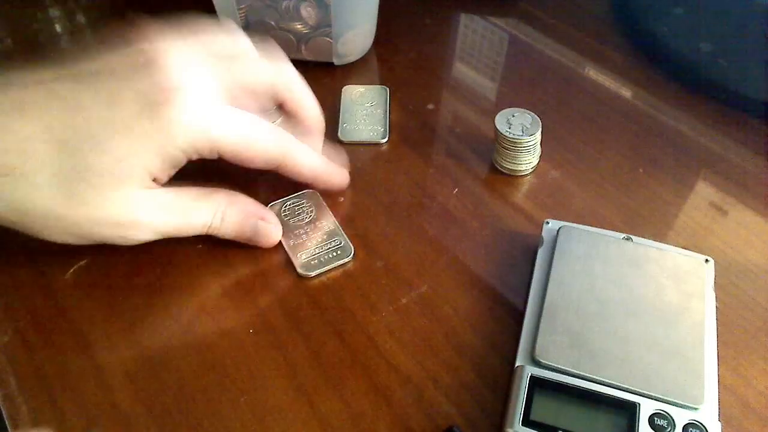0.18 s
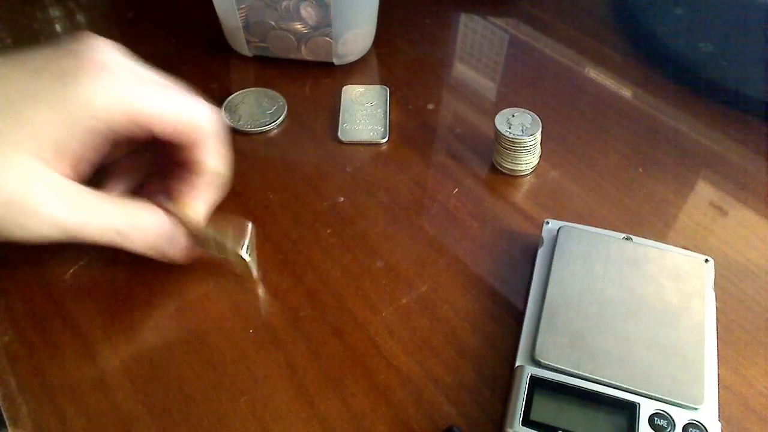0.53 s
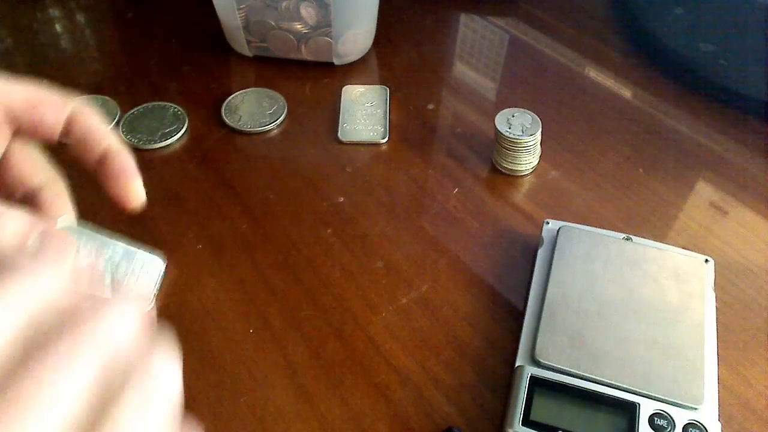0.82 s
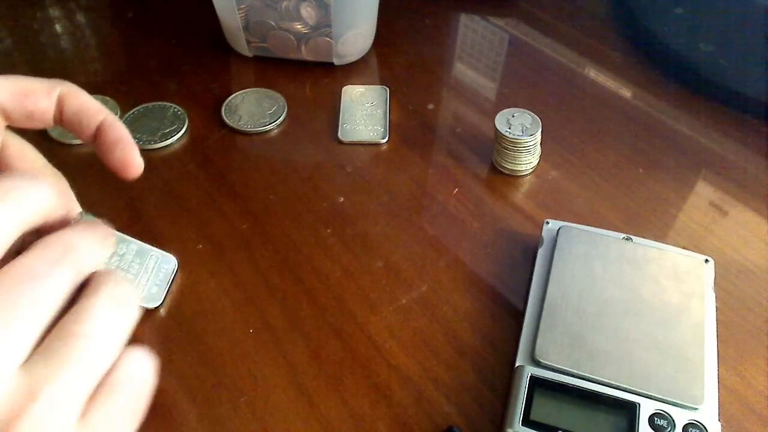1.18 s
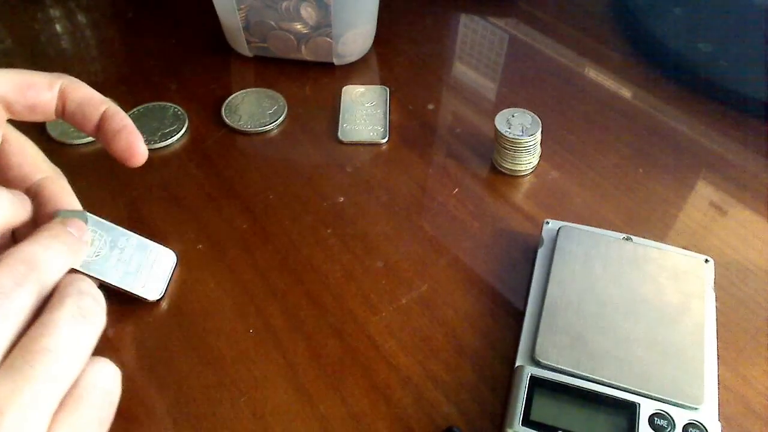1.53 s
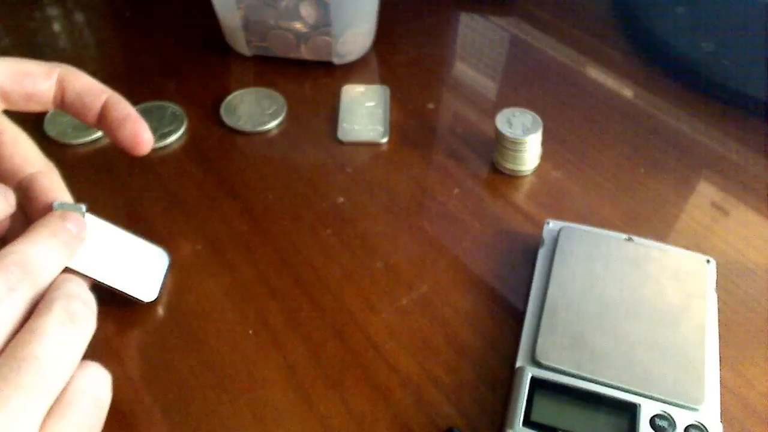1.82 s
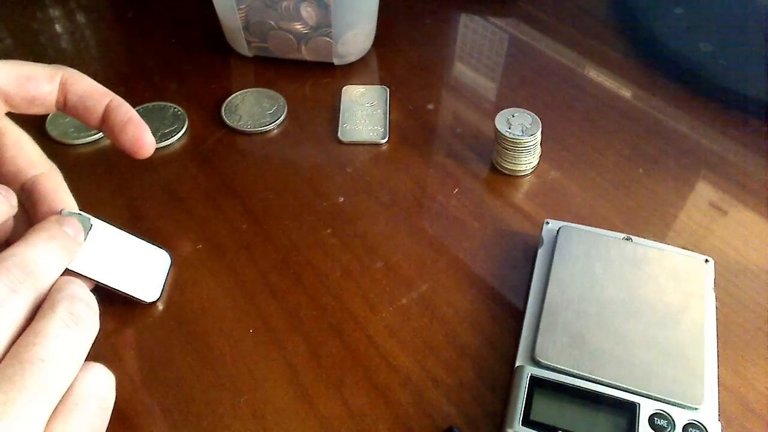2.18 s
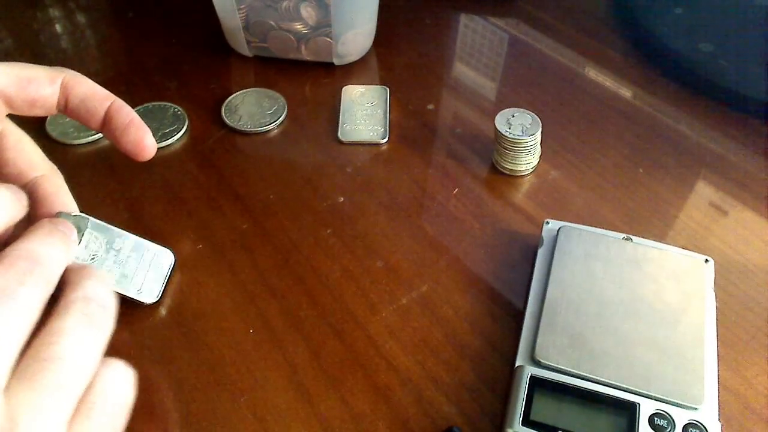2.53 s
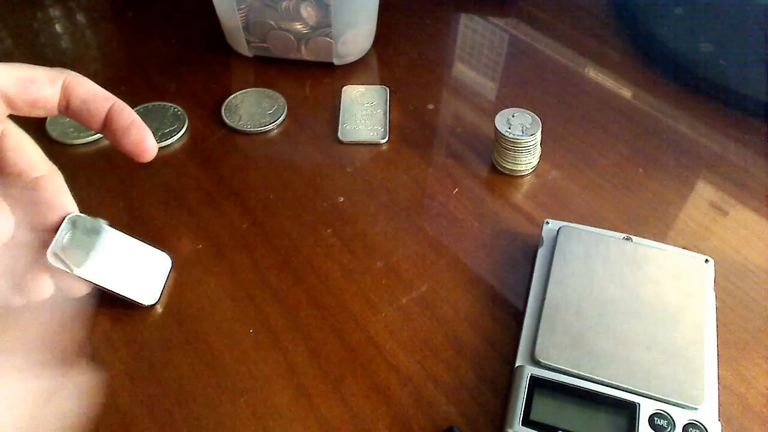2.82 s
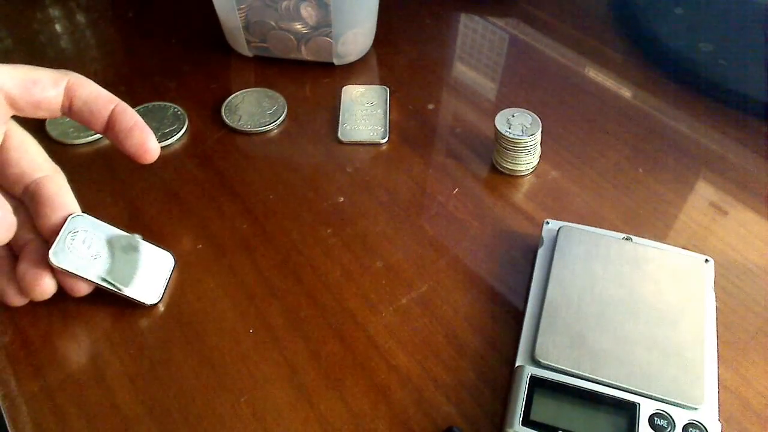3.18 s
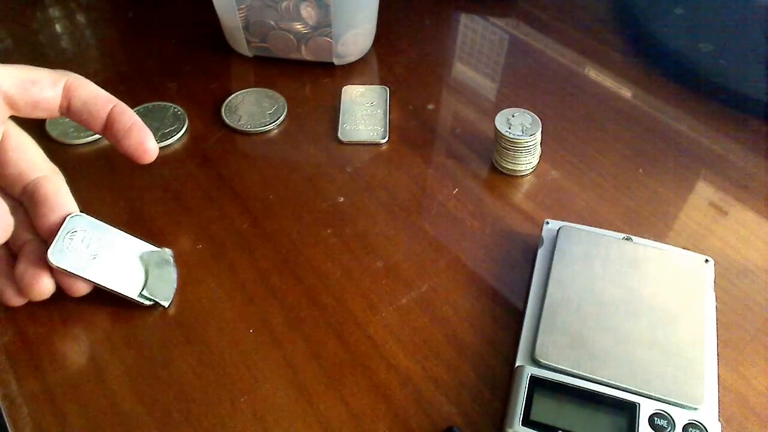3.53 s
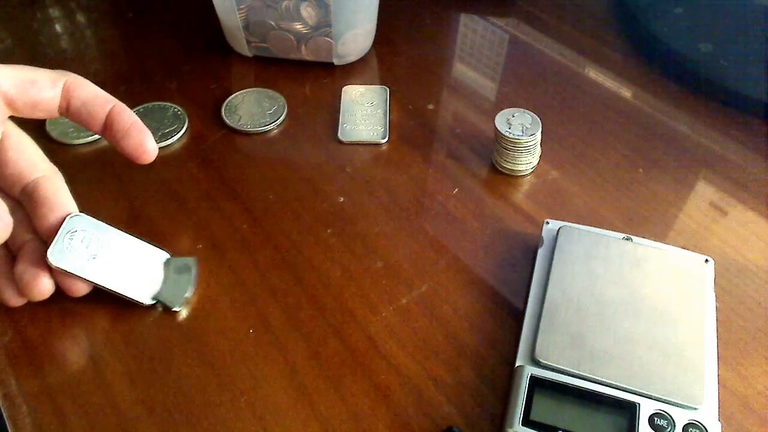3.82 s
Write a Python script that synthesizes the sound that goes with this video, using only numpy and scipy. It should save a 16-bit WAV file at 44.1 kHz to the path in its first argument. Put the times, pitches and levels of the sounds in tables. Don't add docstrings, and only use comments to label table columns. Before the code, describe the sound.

Close up in a small room, a silver bar cracks and clatters on a wooden tabletop, is briefly dragged, then tapped with bright clinks; later faint magnet slips and a small click over low hum.

```python
import sys
import numpy as np
from scipy import signal
from scipy.io import wavfile
from scipy.ndimage import uniform_filter1d

SR = 44100
rng = np.random.default_rng(int(sys.argv[2]) if len(sys.argv) > 2 else 0)


def store_wav(level_fs):
    pcm = np.round(np.clip(np.atleast_2d(level_fs), -1, 1) * 32767)
    wavfile.write(sys.argv[1], SR, pcm.T.astype(np.int16))


def linear_from_db(decibels):
    return 10 ** (np.asarray(decibels, float) / 20)


N = 176400


def evened(x):
    return x / np.sqrt(np.mean(x ** 2) + 1e-20)


def peaked(x):
    return x / (abs(x).max() + 1e-20)


def read(points, hz):
    f, value = np.transpose(points)
    return np.interp(np.log(hz + 1), np.log(f + 1), value)


def coloured(x, points):
    log_gain = np.log(linear_from_db(read(points, abs(np.fft.fftfreq(4096, 1 / SR)))))
    taps = np.fft.ifft(np.exp(np.conj(signal.hilbert(log_gain)))).real[:2048]
    return signal.oaconvolve(x, taps)[:len(x)]


def resonate(x, hz, width_hz):
    turn = np.exp(2j * np.pi * np.cumsum(hz * np.ones(len(x))) / SR)
    r = np.exp(-np.pi * width_hz / SR)
    return 2 * (turn * signal.lfilter([1 - r], [1, -r], x / turn)).real


def resonate_twice(x, hz, width_hz, second_width_hz):
    return resonate(resonate(x, hz, width_hz), hz, second_width_hz)


def wobble(shape):
    rattle_db = 2
    return linear_from_db(rattle_db * evened(uniform_filter1d(rng.standard_normal(shape), size=200)))


def ring(modes, t):
    hz, db, t60 = np.transpose(modes)[:, :, None]
    dying = linear_from_db(db - 60 * t / t60) * np.sin(2 * np.pi * hz * t)
    return (wobble((len(modes), len(t))) * dying).sum(axis=0)


def in_room(near, far, peak_db):
    room_db, gate_s, gate_db, gate_floor_db, mic_low_hz = -12.5, 0.11, -21, -84, 185
    # pitch_hz, t60_s
    room_decay = [(150, 0.07), (600, 0.28), (2000, 0.2), (5000, 0.2), (15000, 0.069)]
    hz, t, z = signal.stft(rng.standard_normal(len(near)), SR, nperseg=256)
    z = z * linear_from_db(-60 * t / read(room_decay, hz)[:, None])
    tail = signal.istft(z, SR, nperseg=256)[1][:len(near)]
    t = np.arange(len(near)) / SR
    tail = tail * np.clip(t / 0.012, 0, 1)
    wet = near + linear_from_db(room_db) * signal.fftconvolve(far, tail / np.linalg.norm(tail))[:len(near)]
    heard = signal.sosfilt(signal.butter(N=4, Wn=mic_low_hz, btype="high", fs=SR, output="sos"), wet)
    open_s = gate_s * max(1 - peak_db / gate_floor_db, .1)
    return heard * linear_from_db(gate_db * (t / open_s) ** 4.5)


def knock(peak_db, low_db, treble_db, contact_s):
    wood_db, wood_share, wood_t60_s, wood_loss = -3, 0.16, .11, -.7
    crack_db, split_low_hz, split_high_hz = 9, 1700, 4400
    spike, echo_s, echo_share = 2.2, 0.0021, .45
    # pitch_hz, level_db; higher modes die sooner
    table_modes = [(222, -3.5), (280, -7), (440, -4), (560, -8), (790, -6.5), (850, 2.5), (1040, 3),
                   (1185, 1), (1560, -2), (1640, -0.5), (2420, -8)]
    # pitch_hz, level_db
    crack_tone = [(100, -18), (1000, -6), (1600, 4), (2050, -4), (2700, -1), (5000, -7), (12500, -6),
                  (15800, -19.5)]
    t = np.arange(0, .17, 1 / SR)

    roughness = linear_from_db(4 * rng.standard_normal(len(t)))
    fading = np.exp(-(t / max(contact_s, 3e-4)) ** 1.5)
    chatter = peaked(rng.standard_normal(len(t)) * roughness * fading)
    echo = np.arange(len(t)) == round(echo_s * SR)
    chatter = peaked(chatter + spike * ((t == 0) + echo_share * echo))
    blow = (t == 0) * np.linalg.norm(chatter)

    lowest_hz = table_modes[0][0]
    modes = [(hz, db, wood_t60_s * (hz / lowest_hz) ** wood_loss) for hz, db in table_modes]
    wood = linear_from_db(wood_db + wood_share * (low_db + 12.5)) * peaked(ring(modes, t))
    tilt = [(split_low_hz * 0.71, low_db + 15.5), (split_low_hz, 0),
            (split_high_hz, 0), (split_high_hz * 1.4, treble_db + 5)]
    near, far = (coloured(linear_from_db(crack_db + 3.5) * coloured(force, crack_tone) + wood, tilt)
                 for force in (chatter, blow))
    return linear_from_db(peak_db + 3.5) * in_room(near, far, peak_db)


def clink(peak_db, favoured_hz, favour_db, damping):
    favour_width_hz, tick_db, tick_s, tick_room_db = 150, -1, 0.0008, 7
    bar_pitches = [2690, 2760, 5895, 6690, 7875, 7930, 9830, 10430, 12240, 12610, 14640, 15320]
    # level_db, t60_s
    bar_levels = [(-7, 0.087), (-10.5, 0.05), (-9, .03), (-9.5, .09), (-6, 0.07), (-5, 0.091), (-6, 0.088),
                  (-7.5, .04), (-2.5, 0.11), (-7, 0.04), (-9.5, .04), (-16.5, 0.028)]
    t = np.arange(0, .17, 1 / SR)
    modes = []
    for hz, (db, t60) in zip(bar_pitches, bar_levels):
        nearness = np.exp(-((hz - favoured_hz) / favour_width_hz) ** 2)
        modes.append((hz, db + favour_db * (nearness - 1), t60 / max(damping, .2)))
    rung = ring(modes, t) * (1 - np.exp(-t / tick_s))
    tick = linear_from_db(tick_db - favour_db) * rng.standard_normal(len(t)) * np.exp(-t / tick_s)
    blow = (t == 0) * np.linalg.norm(tick) * linear_from_db(tick_room_db)
    near, far = (coloured(rung + force, [(1300, -64.0), (2500, -2.0)]) for force in (tick, blow))
    return linear_from_db(peak_db) * in_room(near, far, peak_db)


def grit():
    return rng.standard_normal(N) * linear_from_db(9.5 * uniform_filter1d(rng.standard_normal(N), 40))


def follow(curve, column, outside):
    rows = np.array(curve)
    return np.interp(np.arange(N) / SR, rows[:, 0], rows[:, column], outside, outside)


def drag():
    lower_squeak_db = -0.5
    # time_s, hiss_db, squeak_db, upper_squeak_hz, lower_squeak_hz
    drag_path = [
        (.38, -83.5, -81, 13000, 3490),
        (.4, -73, -80, 12000, 3800),
        (.435, -73, -59, 10800, 3715),
        (.457, -82, -74, 10200, 4010),
        (.49, -73, -57.5, 9450, 4930),
        (.52, -48, -59, 9360, 4780),
        (.545, -43.5, -45.5, 9250, 4460),
        (.585, -50.5, -69, 8800, 4600),
        (.62, -80, -91, 8800, 4700),
    ]
    # pitch_hz, level_db
    hiss_tone = [(1180, -61.5), (2200, -28), (2900, -15), (5000, -5.5), (9290, -1.5), (15100, -6.5),
                 (16300, -35)]
    upper = resonate(grit(), follow(drag_path, column=3, outside=9000), 1200)
    upper = resonate(upper, follow(drag_path, column=3, outside=11000), 2500)
    lower = resonate_twice(grit(), follow(drag_path, column=4, outside=4500), 700, 1400)
    squeaks = evened(upper) + linear_from_db(lower_squeak_db) * evened(lower)
    hiss = evened(coloured(grit(), hiss_tone))
    hiss_gain = linear_from_db(follow(drag_path, column=1, outside=-140))
    return hiss_gain * hiss + linear_from_db(follow(drag_path, column=2, outside=-140)) * squeaks


def slip(peak_db, hz):
    width_hz, rise_s, fall_s = 330, 0.0017, 0.013
    t = np.arange(5000) / SR
    scrape = resonate_twice(rng.standard_normal(len(t)), hz, width_hz, 2 * width_hz)
    return linear_from_db(peak_db) * evened(scrape) * np.minimum(t / rise_s, 1) ** 2 * np.exp(-t / fall_s)


def glide():
    # time_s, level_db, pitch_hz
    glide_path = [
        (3.0, -79, 2820),
        (3.02, -62, 3090),
        (3.07, -64, 3290),
        (3.11, -63.5, 3060),
        (3.15, -64.5, 2700),
        (3.17, -87, 2600),
    ]
    hz = follow(glide_path, column=2, outside=2200)
    return linear_from_db(follow(glide_path, column=1, outside=-140)) * evened(resonate_twice(grit(), hz, 330, 560))


def rub():
    hiss_db = -4
    # time_s, level_db
    rub_path = [
        (2.885, -77.5),
        (2.895, -63),
        (2.92, -66),
        (2.94, -73),
        (2.975, -61.5),
        (3.0, -79),
        (3.04, -100),
        (3.1, -77),
        (3.13, -94),
    ]
    noise = grit()
    bar_modes = [(5900, -7), (6690, -18), (9830, -20), (10430, 1.0), (12600, -6.5), (14640, -30.5)]  # (Hz, dB)
    rung = sum(linear_from_db(db) * evened(resonate(noise, hz, 120)) for hz, db in bar_modes)
    hiss = coloured(noise, [(4000, -40), (6000, -7.5), (10500, 20), (16000, -7)])
    rubbing = evened(evened(rung) + linear_from_db(hiss_db) * evened(hiss))
    return linear_from_db(follow(rub_path, column=1, outside=-140)) * rubbing


def graze(level_db, hz, length_s):
    t = np.arange(0, length_s, 1 / SR)
    width_hz = 260 if hz < 4000 or hz > 10000 else 110
    scrape = resonate_twice(rng.standard_normal(len(t)), hz, width_hz, 2 * width_hz)
    return linear_from_db(level_db) * evened(scrape) * np.sin(np.pi * t / length_s)


def bump(peak_db, length_s):
    swing_hz, thump_db = 159.9, -15.5
    t = np.arange(0, length_s, 1 / SR)
    swing = np.sin(2 * np.pi * (swing_hz * t + rng.random()))
    thump = linear_from_db(thump_db) * np.sin(2 * np.pi * 3.25 * t / length_s)
    return linear_from_db(peak_db - 7.5) * np.sin(np.pi * t / length_s) ** 2 * (swing + thump)


def background():
    hiss_db, hum_width_hz, whine_width_hz = -63.5, 7.2, 4.2
    # pitch_hz, level_db
    room_hiss = [(18, -81.5), (60, -29), (146, -18), (234, -19), (267, -13), (418, -19.5), (972, -22),
                 (10400, -46), (16300, -44.5)]
    # pitch_hz, level_db
    machine_lines = [(156.1, -71), (269.2, -69), (360.7, -73.5), (958.2, -83), (1830, -83), (3661, -93.5),
                     (7321, -95)]
    hiss = linear_from_db(hiss_db - 5) * evened(coloured(rng.standard_normal(N), room_hiss))
    lines = np.zeros(N)
    for hz, db in machine_lines:
        width_hz = hum_width_hz if hz < 1000 else whine_width_hz
        lines += linear_from_db(db) * evened(resonate(rng.standard_normal(N), hz, width_hz))
    return hiss + lines


def add(mix, s, sound):
    part = mix[round(s * SR):][:len(sound)]
    part += sound[:len(part)]


def scene():
    # start_s, peak_db,
    # low_wood_db, treble_db, contact_s
    knocks = [(0.0074, 1, -20, -3.5, 0.0037), (0.0555, -11.5, -20.5, -2, 0.0041),
              (0.0574, -8, -17, -6.5, 0.0046), (0.0638, -20, -42, 2, 0.0029), (0.0907, -9, -22, -7, 0.012),
              (0.0945, -18.5, -20.5, 5, 0.0022), (0.114, -22, -23, -20, 0.0022),
              (0.1175, -10, -19.5, -5, 0.0081), (0.1328, -16.5, -16.5, -6.5, 0.0024),
              (0.2974, -70.5, 2, 0, 0.003), (0.3162, -57, -18, -4, 0.0026),
              (0.4328, -55.5, -37, -16, 0.0047), (0.5913, -28, -23.5, -10, 0.012),
              (0.6352, -8, -20, -9.5, 0.0041), (0.9823, -3.5, -22, -9, 0.0052),
              (0.9965, -14.5, -15.5, -26, 0.0016), (1.076, -40, -28, -38, 0.005),
              (1.2675, -30, -95, 13.5, 0.003), (1.3057, -31.5, -27.5, -25, 0.0023),
              (1.4338, -8, -22.5, -6, 0.0044), (1.4473, -25.5, -8, -13.5, 0.0052),
              (2.035, -28.5, -32, -12.5, 0.0058), (2.045, -44.5, -8.5, -35, 0.004),
              (2.064, -45.5, -26, -28, 0.002), (2.5028, -55.5, -5.5, -10, 0.0055),
              (2.7973, -51, -12.5, -13.5, 0.003), (3.6158, -15.5, -63, -10.5, 0.0022),
              (3.8129, -38.5, -63, -22.5, 0.0076), (3.8741, -34.5, -55, -10.5, 0.0024)]
    # start_s, peak_db, favoured_hz, favour_db, damping (factor)
    clinks = [(.008, -28, 7890, 12, 1.9), (.092, -13, 12240, 9, 5.4), (.099, -33, 7890, 20, 3),
              (.985, -30.5, 12240, 21, 0.39), (.987, -21, 6690, 24, 1.5), (.988, -31, 7890, 26, 1.36),
              (1.268, -12, 12240, 3.5, 1.07), (1.436, -15.5, 10430, 24.5, 1), (1.462, -18.5, 9830, 8.5, 5),
              (1.462, -16.5, 14640, 23.5, 2.6), (2.036, -31.5, 14640, 25.5, 0.72),
              (2.036, -36, 12240, 19, 2.4), (2.038, -57, 7890, 24, 1.9), (2.974, -43, 6690, 25.5, 1.55),
              (3.629, -45, 7890, 16, 1.07), (3.815, -42, 9830, 16.5, 1.25), (3.815, -46.5, 5895, 25, 0.56),
              (3.875, -50, 7890, 11, 1.1)]
    # start_s, peak_db, length_s
    bumps = [(0.492, -44.5, 0.038), (0.727, -52, 0.036), (0.849, -46, 0.05), (1.187, -49, 0.037),
             (1.594, -38.5, 0.037), (1.669, -52, 0.05), (1.792, -57, 0.042), (1.894, -41, 0.04),
             (2.306, -52.5, 0.05), (2.795, -44, 0.042), (2.875, -41.5, 0.036), (3.137, -40, 0.048),
             (3.221, -51, 0.038), (3.684, -46, 0.036), (3.873, -50.5, 0.04)]
    # start_s, level_db, pitch_hz
    slips = [(3.815, -52, 2880), (3.875, -56, 2870), (2.8, -57, 2480), (2.89, -65, 2660),
             (2.973, -50, 2640), (3.015, -50.5, 2650), (3.03, -52, 2540), (3.095, -49.5, 2620),
             (3.247, -55, 2470), (3.279, -51, 2560), (3.559, -52.5, 2780), (3.592, -50, 2700),
             (3.687, -67, 2870)]
    # start_s, level_db, pitch_hz, length_s
    grazes = [(.022, -35.5, 3060, 0.037), (.025, -37, 10220, 0.032), (.78, -79.5, 10300, .04),
              (1.37, -72.5, 6750, 0.049), (1.39, -60, 7950, 0.1), (1.41, -77.5, 11820, 0.034),
              (2.085, -72, 14700, 0.034), (2.09, -67, 2500, 0.019), (2.155, -76.5, 10220, 0.039),
              (2.155, -76, 14950, .035), (2.145, -73.5, 2547, .06), (3.38, -71, 2620, 0.046),
              (3.42, -65, 2536, 0.045), (3.48, -68, 2800, .065), (3.59, -65.5, 6820, 0.016),
              (3.73, -72, 2660, 0.038), (3.94, -76.5, 3320, 0.053)]
    mix = background() + drag() + rub() + glide()
    for events, source in [(knocks, knock), (clinks, clink), (bumps, bump), (slips, slip), (grazes, graze)]:
        for start_s, *settings in events:
            add(mix, start_s, source(*settings))
    return mix[None]


def roll_off(x):
    return signal.sosfilt(signal.butter(12, 16450, fs=SR, output="sos"), x)


def record(dry):
    edge_hz, rumble_hz = 15900, 45
    limited = signal.oaconvolve(np.clip(dry, -1, 1), signal.firwin(511, edge_hz, fs=SR)[None], "same")
    rumble_filter = signal.butter(N=2, Wn=rumble_hz, btype="high", fs=SR, output="sos")
    return roll_off(signal.sosfilt(rumble_filter, limited))


dry = scene()
out = record(dry)
store_wav(out)
```